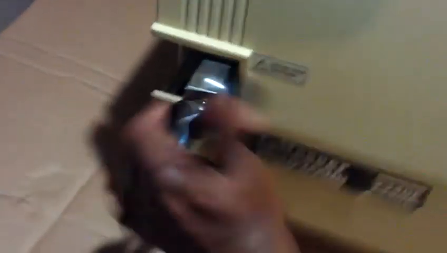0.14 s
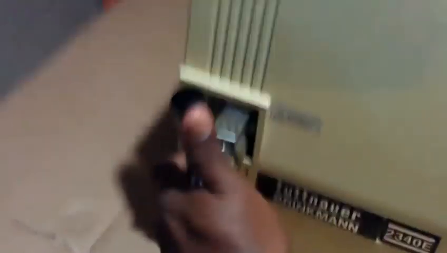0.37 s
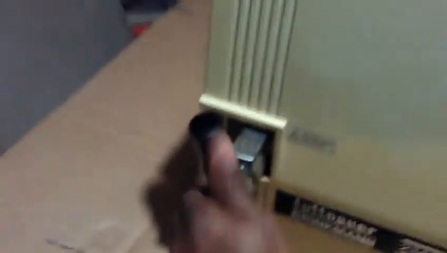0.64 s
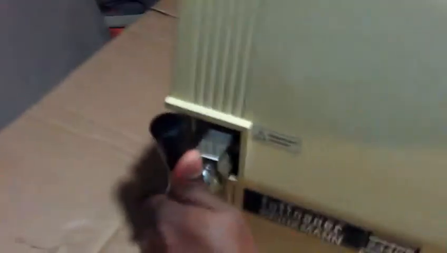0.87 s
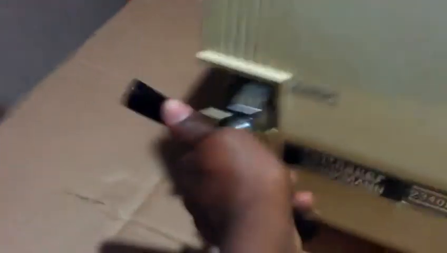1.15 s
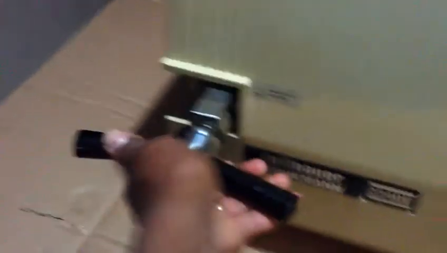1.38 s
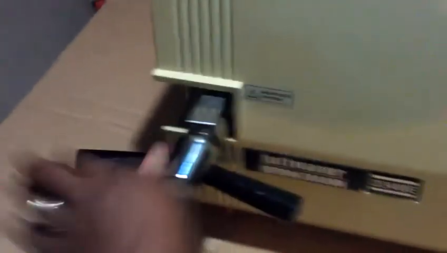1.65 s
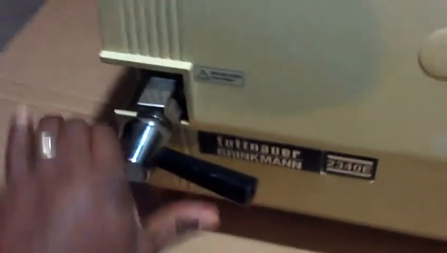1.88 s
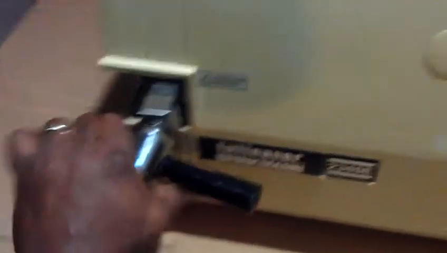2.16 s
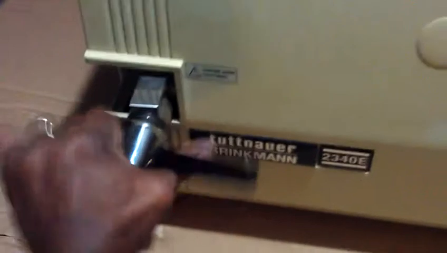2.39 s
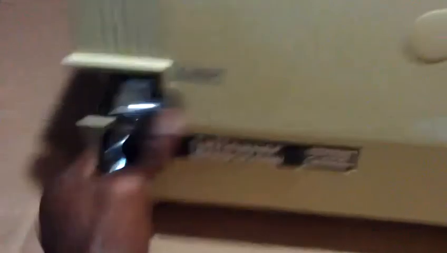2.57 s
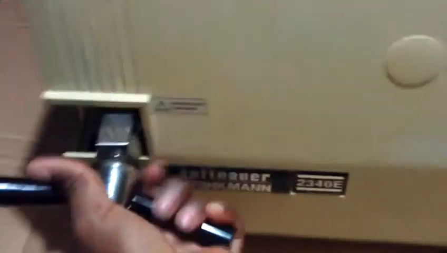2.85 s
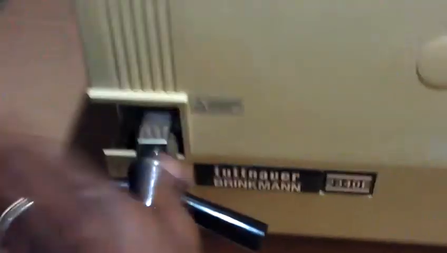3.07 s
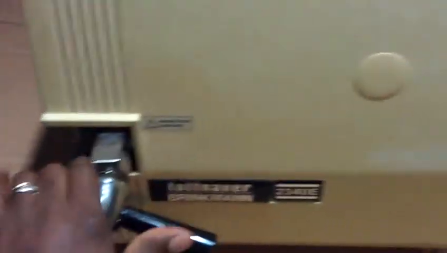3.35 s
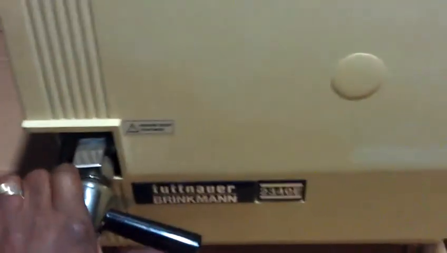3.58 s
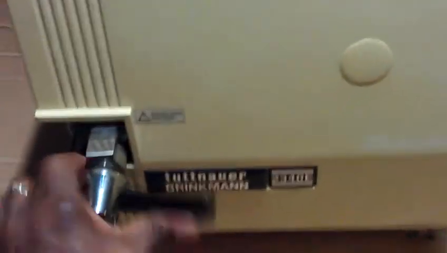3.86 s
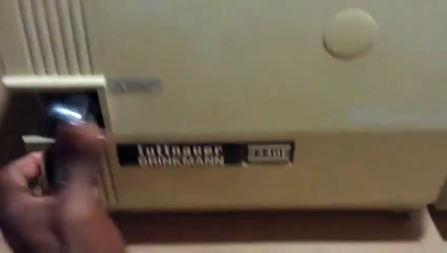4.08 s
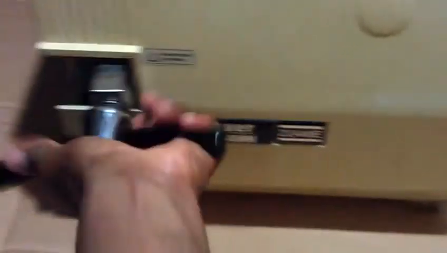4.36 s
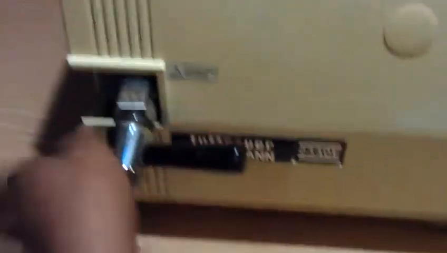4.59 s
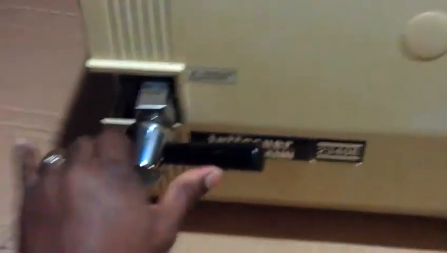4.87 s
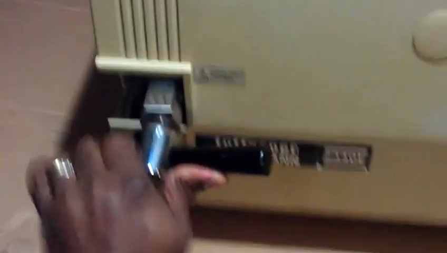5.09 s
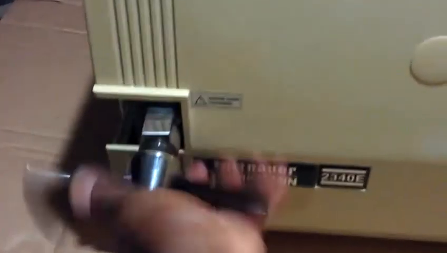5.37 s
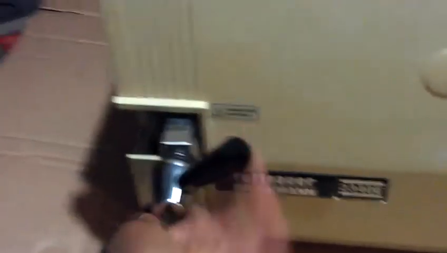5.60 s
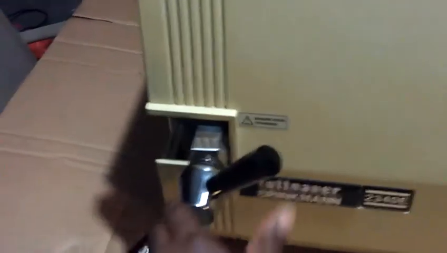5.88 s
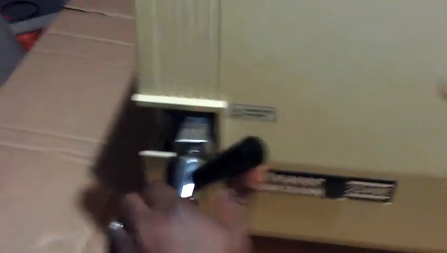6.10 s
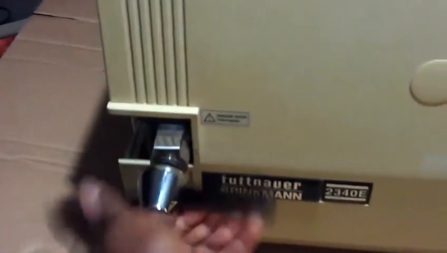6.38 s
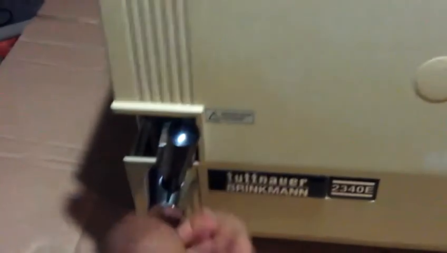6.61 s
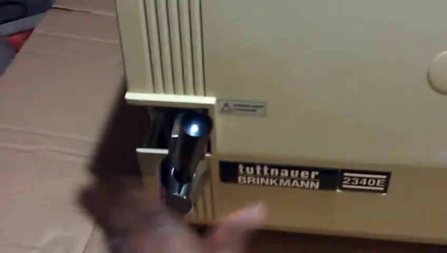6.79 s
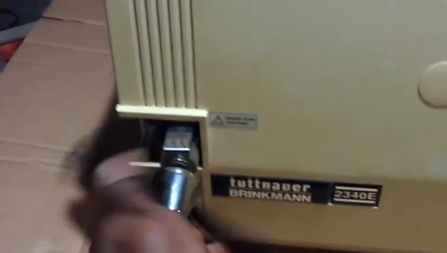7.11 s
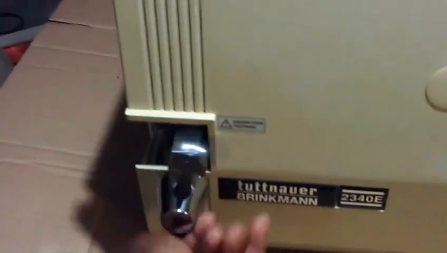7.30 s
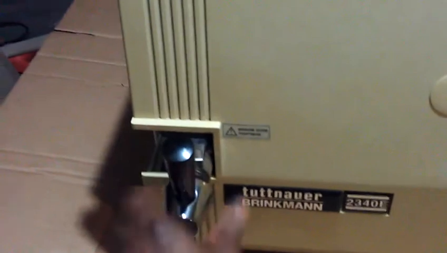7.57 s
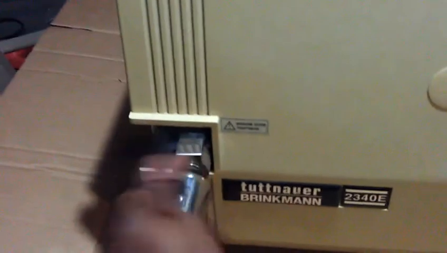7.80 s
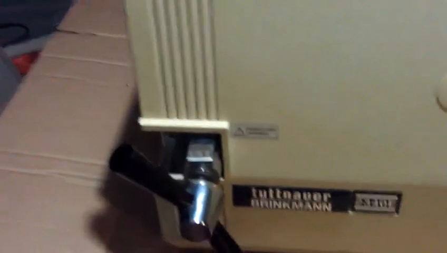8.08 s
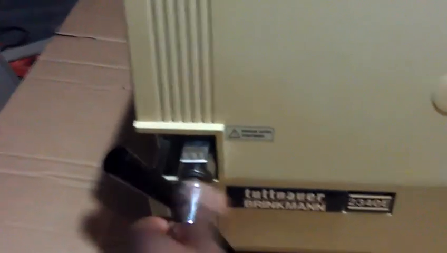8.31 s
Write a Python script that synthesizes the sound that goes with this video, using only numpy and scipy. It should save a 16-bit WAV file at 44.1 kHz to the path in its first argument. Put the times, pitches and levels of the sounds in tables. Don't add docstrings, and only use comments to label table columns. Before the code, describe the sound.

Very close, a hand works a loose metal handle on a hollow steel door. Five sharp clacks land at uneven gaps, most of them loud, each with a short boom and shudder. Between them come scrapes, finger ticks, thin snaps and brief squeaks. Near the end the bar slides and chatters quickly. Steady night insects and hiss sit behind, in a small shed with short reverberation, through a slightly clipping small camera microphone.

```python
import sys
import numpy as np
from scipy import signal
from scipy.fft import rfft, irfft, next_fast_len
from scipy.io import wavfile
from scipy.ndimage import map_coordinates

SR = 44100
rng = np.random.default_rng(int(sys.argv[2]) if len(sys.argv) > 2 else 0)


def convert_level_to_amplitude(level_db):
    exponent = np.asarray(level_db, float) / 20
    return 10 ** exponent


def transcribe(u):
    v = np.clip(np.atleast_2d(u).T, -1, 1)
    q = np.round(v * 32767).astype(np.int16)
    wavfile.write(sys.argv[1], SR, q)


N = 372644
T = np.arange(N) / SR

# frequency in Hz, density in dB per Hz.
AIR_DENSITY = [(24, -60), (40, -27), (91, -22.5), (108, -9.5), (210, -11.5), (229, -2.5), (438, -4),
               (478, 1), (521, -11), (807, -0.5), (1270, -8), (1650, -3.5), (2600, -14), (3380, -20.5),
               (5720, -120)]
# frequency in Hz, density in dB per Hz.
HISS_DENSITY = [(1500, -32), (2300, -15), (3500, 7.5), (5200, -1), (5800, -48), (6900, -34), (7700, 1),
                (8500, -7.5), (9500, -0.5), (11000, 0.5), (13900, 1.5), (14500, -36)]
# frequency in Hz, density in dB per Hz.
TREE_CHORUS = [(2750, -24), (2850, -9), (2930, -9), (3020, -9.5), (3150, -33)]
# frequency in Hz, density in dB per Hz.
GRASS_CHORUS = [(6000, -18), (6250, -3), (6400, -0.5), (6560, 0), (6700, -6.5), (6880, -25.5)]
# start in seconds, chirp level in dB.
CRICKET_CHIRPS = [(.22, -48.5), (.6, -50), (1.35, -53), (1.73, -49), (2.55, -52), (2.98, -48), (3.37, -50),
                  (3.85, -49), (4.21, -45.5), (4.6, -72), (4.97, -50), (5.73, -47), (6.08, -44),
                  (6.47, -47), (6.83, -46.5), (7.23, -45.5), (7.6, -45), (8.18, -46)]

# frequency in Hz, left-right likeness from 0 to 1.
PORT_LIKENESS = [(60, 0.76), (200, 1), (500, 0.4), (1200, 0.17), (3000, 0.14), (13000, 0.12)]
# frequency in Hz, left minus right in dB.
PORT_TILT = [(60, 4), (110, 8), (200, 0), (360, 2), (660, 4.5), (1210, -3), (2200, 1), (4010, 1), (7310, 1),
             (13300, 9)]
# frequency in Hz, lag in radians.
PORT_LAG = [(100, 0.88), (260, 0.13), (700, 2.92), (1100, 3.94), (1700, 5.44), (14000, 7.35)]
# frequency in Hz, t60 in seconds.
SHED_T60 = [(150, 0.42), (1000, 0.36), (4000, 0.25), (12000, 0.24)]

# frequency in Hz, width in Hz, level in dB.
CHAMBER_MODES = [(139.8, 34, -10), (188, 27, -0.5), (300, 61, -3.5), (360, 32.5, -0.5), (425, 26, 0.5),
                 (563, 82, -4.5)]
# frequency in Hz, width in Hz, level in dB.
BAR_MODES = [(850, 87, 4), (1050, 87, 4.5), (1440, 173, 1.5), (1745, 140, 2.5), (2445, 790, -3)]
# frequency in Hz, width in Hz, level in dB.
HUB_MODES = [(2500, 71, -13), (2904, 610, 0), (3600, 120, -1), (4020, 274, -1), (4625, 380, 0),
             (5224, 760, -4.5)]
# frequency in Hz, width in Hz, level in dB.
PORT_MODES = [(8550, 1000, 1.5), (9850, 620, 7), (10900, 1130, 7), (13000, 2700, -7)]
# frequency in Hz, level in dB, t60 in seconds.
STEEL_PARTIALS = [(1762, -8, 0.08), (3130, -53, 0.27), (3570, -22, 0.2), (4020, -36, 0.083),
                  (10200, -28, .08), (10000, -38, .12), (10650, -46, 0.33)]

# start in seconds, rumble in dB, boom in dB.
SHUDDERS = [(0.149, -29.5, -18), (1.044, -34, -39), (2.39, -29.5, -22.5), (3.878, -44, -32),
            (5.39, -24.5, -19.5)]
SHUDDER_FALL_20DB_S = 0.14
# frequency in Hz, level in dB.
DOOR_MODES = [(186, 0.5), (175.9, -2.5), (140, -8.5)]
BOOM_RISE_S, BOOM_T60_S = 0.01, 0.32

# time in seconds, rumble in dB.
GRIP = [(0, -39.5), (.55, -44.5), (1.0, -44), (1.4, -45.5), (2.3, -43), (2.5, -42.5), (2.8, -50.5),
        (3.08, -54), (3.6, -50), (3.9, -44.5), (4.6, -49.5), (5.5, -48), (6.1, -54.5), (8.45, -58)]
GRIP_BAR_DB, GRIP_RASP_DB, GRIP_SKIN_DB = -82, -60.5, -62.5
# start in seconds, length in seconds,
# bar level in dB, weight in dB, brightness in dB.
SLIDES = [(5.1, 0.23, -37.5, -6.5, -6), (6.17, 0.15, -37, -0.5, -6), (6.3, 0.14, -35.5, 1, -7.5),
          (7.09, 0.082, -34.5, -4, -12), (7.17, 0.1, -35, 6, -6.5), (7.8, 0.15, -34.5, 4.5, -6)]
SLIDE_RISE_DB, SLIDE_FALL_20DB_S = 17.5, 0.092
# start in seconds, length in seconds, bar level in dB,
# weight in dB, brightness in dB.
TURNS = [(.015, 0.017, -61, 8, 10), (.335, 0.072, -44.5, -18, -6.5), (.49, 0.025, -61, 20, 5),
         (1.14, .22, -53, 6, -0.5), (1.5, 0.082, -64, -5, 12), (2.03, 0.033, -53, 0, -16),
         (2.5, 0.17, -48.5, 6, -2), (2.66, 0.12, -46.5, -8, 1.5), (2.93, 0.16, -52.5, 10, -4),
         (3.3, 0.041, -56.5, 13.5, -12), (3.4, 0.1, -62, -1, 6), (3.99, 0.19, -45.5, -15, -5.5),
         (4.24, 0.17, -42.5, -6, -7), (4.68, .05, -51, -15, -6), (5.86, 0.059, -64, 15, -11),
         (4.19, 0.051, -46, 9.5, -4), (5.645, .02, -65.5, -2, 15), (6.66, 0.021, -65, 2, 14),
         (7.47, .02, -66, 2, 14), (8.13, 0.033, -61.5, 15, 10.5)]
TURN_RISE_20DB_S, TURN_FALL_20DB_S = 0.032, 0.055
RASP_DB, RASP_SHARE = -3, 0.56

# start in seconds, length in seconds, from Hz, to Hz, level in dB.
SQUEAKS = [(2.03, 0.029, 1400, 1700, -39), (2.03, 0.016, 850, 830, -28), (2.421, 0.057, 1110, 1106, -37),
           (2.616, 0.132, 3080, 3140, -42), (2.715, 0.11, 3500, 3220, -45), (4.2, 0.025, 3114, 3090, -36),
           (5.551, 0.051, 1140, 1110, -38.5), (5.357, 0.02, 1750, 1740, -32),
           (6.195, 0.113, 1528, 1500, -36), (6.41, 0.027, 1550, 1470, -25), (7.846, 0.092, 1050, 1055, -36),
           (5.2, 0.13, 2000, 2050, -44.5), (3.878, 0.013, 1560, 1530, -25)]
# start in seconds, length in seconds, from Hz, to Hz, level in dB.
WHISTLES = [(6.442, 0.036, 3600, 3600, -39), (6.476, 0.025, 3060, 3050, -37),
            (7.158, .022, 3570, 3540, -38), (7.978, 0.029, 3090, 3090, -33)]

# start in seconds, peak in dB, colour in Hz, sizzle in dB.
SCUFFS = [(.146, -26, 2320, -9), (1.042, -25.5, 2970, -8), (2.392, -30, 1700, -12),
          (5.386, -22.5, 2400, -5.5), (.332, -24, 3070, -18), (.478, -41, 8500, 6), (1.2, -55, 3600, -6)]
# start in seconds, peak in dB, colour in Hz, sizzle in dB.
CRACKS = [(1.509, -32, 3600, 0), (3.7524, -25.5, 2500, -3.5), (4.6872, -26.5, 4940, -7)]
LIGHT_THUD_DB, LIGHT_THUD_HZ = -29, 328
# start in seconds, peak in dB, colour in Hz, sizzle in dB.
SNAPS = [(0.026, -23.5, 10800, -30), (1.492, -23, 11900, -12), (1.506, -28, 10600, -15),
         (1.578, -33, 8850, -4), (1.909, -38, 11200, -10), (1.9739, -36, 10600, -14),
         (2.0857, -36, 9770, -12), (2.202, -24, 9400, -16), (2.925, -24.5, 9900, -8),
         (3.3688, -32, 10500, -12), (3.4291, -30, 10700, -22), (3.5104, -36, 12100, -14),
         (4.139, -41, 11300, -21), (4.4886, -34, 10200, -19), (4.6079, -41, 11300, -15),
         (4.7376, -37, 11700, -14), (4.7552, -29, 11500, -15), (5.0893, -37, 12300, -12),
         (7.476, -31, 10900, -17), (8.1274, -46, 10040, -12)]
# start in seconds, peak in dB, colour in Hz, thud in dB,
# thud in Hz.
TICKS = [(1.533, -31, 3600, -26, 198), (1.671, -29, 784, -0.5, 370), (2.025, -21, 5330, -19, 211),
         (2.03, -22.5, 1500, -23, 423), (2.935, -25, 865, -10, 219), (2.985, -33, 885, -11, 408),
         (3.31, -41, 2950, 9, 412), (3.4, -24.5, 2530, -16, 310), (3.441, -23, 2240, -16, 315),
         (3.496, -30.5, 2330, -16, 229), (4.212, -32, 3110, -14, 273), (5.229, -32, 1880, 0, 186),
         (5.882, -45, 2850, 9, 462), (6.206, -29, 1560, -11, 198), (6.275, -26, 1550, -6, 570),
         (6.341, -30, 1530, 3, 306), (6.382, -25, 1500, -6, 199), (6.416, -16.5, 1570, -8.5, 360)]
# start in seconds, peak in dB, colour in Hz, thud in dB, thud in Hz.
CHATTER = [(6.23, -33, 1480, -16, 300), (6.248, -30, 1480, -16, 300), (6.453, -28, 1460, -8, 300),
           (7.117, -35, 1440, -6, 398), (7.126, -38.5, 1030, 6.5, 400), (7.137, -34, 1480, -12, 400),
           (7.163, -29, 1030, 1, 457), (7.178, -34, 1030, 0, 420), (7.207, -29.5, 1020, 3, 400),
           (7.226, -29.5, 1440, 2.5, 300), (7.258, -25, 1440, -7, 400), (7.275, -30, 1440, 2.5, 400),
           (7.292, -33, 1030, 6.5, 350), (7.303, -30, 1470, -4, 300), (7.314, -32, 1440, 4, 300),
           (7.334, -40.5, 1030, 8.5, 324), (7.833, -36, 1460, -2, 400), (7.843, -34, 1060, 4.5, 380),
           (7.854, -31, 1060, -2, 300), (7.869, -33, 1060, 4, 328), (7.884, -29, 1060, -3, 328),
           (7.892, -30, 1440, 4.5, 330), (7.903, -29.5, 1440, -1, 327), (7.919, -30, 1050, -7, 400),
           (7.932, -29, 1440, 2, 422), (7.945, -32, 1440, -2, 420), (7.965, -28, 2500, -1, 400),
           (7.98, -33, 1440, 4, 330), (7.998, -39, 1440, 7, 330), (8.019, -43, 1040, 9, 280)]
DULL_SIZZLE_DB = -23
# start in seconds, peak in dB, thud in dB, sizzle in dB.
CATCHES = [(6.2914, -19.5, -40, -2), (7.1569, -21, -17, -12), (7.2423, -20.5, -30, -2),
           (7.9592, -21.5, -32, -12)]
CATCH_HZ, CATCH_THUD_HZ = 1500, 415
# start in seconds, peak in dB, colour in Hz, # thud
# in dB, thud in Hz.
BAR_CONTACTS = [(0.141, -18, 2010, -32, 360), (0.1488, -18, 1800, -32, 360), (1.0323, -11, 5460, -26, 395),
                (1.037, -11.5, 1610, -20.5, 408), (2.386, -13.5, 1606, -36, 300), (3.874, -20, 2620, -32, 300),
                (3.8812, -21, 2500, -17, 424), (5.3785, -12, 2270, -32, 400), (5.379, -15.5, 4370, -32, 400),
                (0.1375, -15.5, 2500, -32, 360), (2.3837, -16, 4700, -32, 300), (6.2934, -22, 4200, -32, 400),
                (7.1571, -24.5, 3600, -32, 400), (7.243, -24, 3220, -32, 400), (7.9548, -24, 3000, -32, 400),
                (5.3843, -10.5, 1690, -12, 429)]
BAR_CONTACT_SIZZLE_DB = -16
# start in seconds, peak in dB, colour in Hz, sizzle in dB, thud in Hz.
CLACKS = [
    (0.1363, -5, 4960, 2.5, 354.4),
    (1.0286, -4, 4500, -4.5, 530),
    (2.3824, -11, 2610, -4, 300),
    (3.8722, -12, 1470, -8.5, 417),
    (5.3772, -4, 3130, -2, 378),
]
CLACK_THUD_DB = -28.5
# start in seconds, frequency in Hz, level in dB, t60 in seconds.
LANDING_RINGS = [(.1365, 1680, -19, 0.055), (.1365, 2500, -21, .05), (.1365, 4980, -15, .03),
                 (.1365, 5250, -14, .03), (.1365, 10200, -11, .025), (1.029, 570, -17, 0.074),
                 (1.029, 1500, -20, .06), (1.029, 1740, -23, 0.065), (1.029, 2810, -17, .04),
                 (1.029, 4330, -13, .04), (1.029, 5430, -19, .03), (1.029, 11300, -15, .03),
                 (2.3825, 1660, -16.5, .055), (2.3825, 2500, -21, .06), (2.3825, 2720, -22, .03),
                 (2.3825, 480, -26, .05), (3.8727, 1644, -22, .06), (3.8727, 2483, -23, .05),
                 (3.8727, 570, -30, .05), (3.8727, 330, -31, .06), (5.378, 850, -19, 0.097),
                 (5.378, 1031, -16, .08), (5.378, 1815, -22, .06), (5.378, 2990, -20, 0.064),
                 (5.378, 626, -22, .04), (5.378, 9650, -14, .03), (5.378, 12530, -20, .025),
                 (6.292, 1850, -27, .05), (6.292, 2380, -28, .045), (6.292, 7650, -28, 0.033),
                 (6.292, 12300, -30, .025)]
RING_RISE_S = 0.00061


def unit(x):
    return x / np.sqrt(np.mean(x ** 2) + 1e-20)


def peak(x):
    return x / np.abs(x).max()


def along(points, hz):
    f, v = np.transpose(points)
    return np.interp(np.log(hz + 1), np.log(f + 1), v)


def wobble(rate_hz):
    knots = rng.standard_normal(int(N * rate_hz / SR) + 4)
    return map_coordinates(knots, [T * rate_hz])


def filtered(x, response):
    m = next_fast_len(x.shape[-1] + 2048)
    spectrum = rfft(x, m) * response(np.fft.rfftfreq(m, 1 / SR))
    return irfft(spectrum, m)[..., :x.shape[-1]]


def body(modes):
    def response(f):
        total = 0
        for k, (hz, width_hz, db) in enumerate(modes):
            total = total + (-1) ** k * convert_level_to_amplitude(db) * 1j * f * width_hz / (hz * hz - f * f + 1j * f * width_hz)
        return total
    return response


def noise(density):
    points = [(1, -120)] + density + [(SR, -120)]
    return unit(filtered(rng.standard_normal((2, N)), lambda hz: convert_level_to_amplitude(along(points, hz))))


def ports(pair, closeness=0.):
    def mix(hz):
        alike = np.clip(along(PORT_LIKENESS, hz) + closeness, 0, 1)
        half_tilt_db = .5 * along(PORT_TILT, hz)
        late = np.exp(-1j * along(PORT_LAG, hz)) * convert_level_to_amplitude(-half_tilt_db)
        return np.array([convert_level_to_amplitude(half_tilt_db), alike * late, np.sqrt(1 - alike ** 2) * late])
    left, shared, own = filtered(pair[[0, 0, 1]], mix)
    return np.array([left, shared + own])


def night():
    air = convert_level_to_amplitude(-46 + 0.11 * wobble(3.65) + 1.24 * wobble(25)) * noise(AIR_DENSITY)
    hiss = convert_level_to_amplitude(-54.5) * noise(HISS_DENSITY)
    trees = convert_level_to_amplitude(-51 + 0.96 * wobble(17)) * noise(TREE_CHORUS)
    grass = convert_level_to_amplitude(-48.0 + 1.7 * wobble(18)) * noise(GRASS_CHORUS)
    chirp = np.zeros(N)
    for s, db in CRICKET_CHIRPS:
        at = slice(int(s * SR), int(s * SR) + SR // 4)
        u = T[at] - s
        edges = np.clip(np.minimum(u, 0.174 - u) / 0.0069, 0, 1)
        chirp[at] += convert_level_to_amplitude(db) * edges * np.sin(np.pi * 26 * u) ** 2
    cricket = chirp * np.sin(2 * np.pi * 6135 * T + 1.2 * wobble(40))
    whine = convert_level_to_amplitude(-60.5 + 3.3 * wobble(4.14)) * np.sin(2 * np.pi * 1603 * T + 1.9 * wobble(6))
    return air + hiss + trees + grass + cricket + whine


def shed(x):
    step, out = SR // 2, np.zeros((2, N + 2 * SR))
    delay = round(.005 * SR)
    for start in range(-step // 2, N, step):
        first = max(start, 0)
        hz, t, z = signal.stft(rng.standard_normal((2, step)), SR, nperseg=256)
        decay = convert_level_to_amplitude(-60 * t / along(SHED_T60, hz)[:, None])
        tail = signal.istft(z * decay, SR, nperseg=256)[1]
        answer = signal.fftconvolve(x[:, first:start + step], tail / np.linalg.norm(tail[0]), axes=1)
        out[:, first + delay:][:, :answer.shape[1]] += answer
    return out[:, :N]


def door():
    out = np.zeros(N)
    for s, _, db in SHUDDERS:
        at = slice(int(s * SR), int(s * SR) + SR // 2)
        u = T[at] - s
        ring = sum(convert_level_to_amplitude(level) * np.sin(2 * np.pi * hz * u) for hz, level in DOOR_MODES)
        swell = 1 - np.exp(-(u / BOOM_RISE_S) ** 2)
        out[at] += convert_level_to_amplitude(db - 2.5 - 60 * u / BOOM_T60_S) * swell * ring
    return out


def strokes():
    rest_db = np.interp(T, *np.transpose(GRIP))
    flat = np.zeros(N)
    power = convert_level_to_amplitude(np.array([rest_db, flat + GRIP_BAR_DB, flat + GRIP_RASP_DB, flat + GRIP_SKIN_DB])) ** 2
    for rows, sliding in ((SLIDES, True), (TURNS, False)):
        for s, length, db, weight_db, bright_db in rows:
            at = slice(max(int(s * SR) - SR // 10, 0), int((s + length) * SR) + SR // 4)
            t = T[at]
            before, after = np.maximum(s - t, 0), np.maximum(t - s - length, 0)
            fall_s = SLIDE_FALL_20DB_S if sliding else TURN_FALL_20DB_S
            shape_db = -20 * before / TURN_RISE_20DB_S - 20 * after / fall_s
            if sliding:
                shape_db = shape_db - SLIDE_RISE_DB * np.maximum(s + length - t, 0) / length
            colour_db = np.array([weight_db, 0, RASP_DB + RASP_SHARE * bright_db, bright_db])
            power[:, at] += convert_level_to_amplitude(db + colour_db[:, None] + shape_db) ** 2
    for s, db, _ in SHUDDERS:
        at = slice(int(s * SR), int(s * SR) + SR // 2)
        power[0, at] += convert_level_to_amplitude(db - 20 * (T[at] - s) / SHUDDER_FALL_20DB_S) ** 2
    return np.sqrt(power)


def rubbing():
    out = 0
    bodies = (CHAMBER_MODES, BAR_MODES, HUB_MODES, PORT_MODES)
    lumps = (4.6, 4.0, 2.3, 2.0)
    rates_hz = (34.52, 70.4, 109.3, 58.8)
    for level, modes, lumps_db, rate_hz in zip(strokes(), bodies, lumps, rates_hz):
        coarse_db = lumps_db * np.clip(wobble(rate_hz), -2, 1.3)
        fine_db = .5 * lumps_db * wobble(5 * rate_hz)
        grains = convert_level_to_amplitude(coarse_db + fine_db) * rng.standard_normal((2, N))
        out = out + level * unit(filtered(grains, lambda f: body(modes)(f) ** 1.286))
    return out


def squeaks(rows, unsteady):
    out = np.zeros((2, N))
    flutter = convert_level_to_amplitude(2.1 * wobble(76))
    waver = unsteady * np.array([wobble(170), wobble(170)])
    for s, length, from_hz, to_hz, db in rows:
        at = slice(int(s * SR), int((s + length) * SR))
        u = T[at] - s
        phase = 2 * np.pi * (from_hz * u + (to_hz - from_hz) * u * u / (2 * length))
        swell = np.abs(np.sin(np.pi * u / length)) ** .5
        out[:, at] += convert_level_to_amplitude(db) * swell * flutter[at] * np.sin(phase + waver[:, at] * from_hz / 3200)
    return out


def light_contacts(rows):
    return [(s, db, hz, LIGHT_THUD_DB, sizzle, LIGHT_THUD_HZ) for s, db, hz, sizzle in rows]


def dull_contacts(rows):
    return [(s, db, hz, thud, DULL_SIZZLE_DB, thud_hz) for s, db, hz, thud, thud_hz in rows]


def heavy_contacts():
    clacks = [(s, db, hz, CLACK_THUD_DB, sizzle, thud_hz) for s, db, hz, sizzle, thud_hz in CLACKS]
    bar_contacts = [(s, db, hz, thud, BAR_CONTACT_SIZZLE_DB, thud_hz) for s, db, hz, thud, thud_hz in BAR_CONTACTS]
    catches = [(s, db, CATCH_HZ, thud, sizzle, CATCH_THUD_HZ) for s, db, thud, sizzle in CATCHES]
    return sorted(clacks + bar_contacts + catches)


def blows(events, rattle_s, thud_s, thud_db, ring_db, broad_db, walls, spread=0.26):
    out = np.zeros((2, N + SR))
    t = np.arange(int(min(.2, 14 * thud_s + 3 * rattle_s) * SR)) / SR
    for s, db, hz, low_db, high_db, thud_hz in events:
        rattle = np.exp(-(t / rattle_s) ** 1.32) * (1 - np.exp(-t / 0.00024))
        burst = rattle * rng.standard_normal((2, len(t)))
        own = peak(filtered(burst, lambda f: body([(hz, spread * hz, 0)])(f) ** 2))
        hard = convert_level_to_amplitude(0.078 * high_db)
        broad = 0.75 * peak(filtered(burst, body(BAR_MODES))) + hard * peak(filtered(burst, body(HUB_MODES)))
        sizzle = peak(filtered(burst, lambda f: body(PORT_MODES)(f) ** 1.3))

        push = t / thud_s * np.exp(-t / thud_s) * rng.standard_normal((2, len(t)))
        boom_shape = np.exp(-t / (1.52 * thud_s)) * (1 - np.exp(-(t / (0.36 * thud_s)) ** 2))
        boom = np.sin(2 * np.pi * thud_hz * t) * boom_shape
        thud = peak(boom) + walls * peak(filtered(push, body(CHAMBER_MODES)))

        ring = 0
        for f, level, t60 in STEEL_PARTIALS:
            decay = convert_level_to_amplitude(level + rng.normal(0, 1.3, (2, 1)) - 60 * t / t60)
            ring = ring + decay * np.sin(2 * np.pi * f * t + rng.uniform(0, 5.0, (2, 1)))
        hit = own + convert_level_to_amplitude(broad_db) * broad + convert_level_to_amplitude(high_db + 5.0) * sizzle
        hit = hit + convert_level_to_amplitude(low_db + thud_db) * thud + convert_level_to_amplitude(ring_db) * hard * ring
        out[:, round(s * SR):][:, :len(t)] += convert_level_to_amplitude(db) * hit
    return out[:, :N]


def rings():
    out, t = np.zeros(N), np.arange(SR // 8) / SR
    rise = 1 - np.exp(-t / RING_RISE_S)
    for s, hz, db, t60 in LANDING_RINGS:
        out[round(s * SR):][:len(t)] += convert_level_to_amplitude(db - 60 * t / t60) * rise * np.sin(2 * np.pi * hz * t)
    return out


def scene():
    thread = squeaks(SQUEAKS, unsteady=2.6) + squeaks(WHISTLES, unsteady=0.68)
    scuffs = blows(light_contacts(SCUFFS), rattle_s=0.036, thud_s=0.0071, thud_db=-7, ring_db=-30,
                   broad_db=0.0, walls=.3)
    cracks = blows(light_contacts(CRACKS), rattle_s=0.00092, thud_s=0.0069, thud_db=0, ring_db=-32,
                   broad_db=-1.0, walls=.3, spread=0.9)
    thin = [(s, db, hz, -40, sizzle_db, 300) for s, db, hz, sizzle_db in SNAPS]
    snaps = blows(thin, rattle_s=0.0015, thud_s=0.0065, thud_db=-8, ring_db=-37, broad_db=-16.5, walls=.3)
    ticks = blows(dull_contacts(TICKS), rattle_s=0.0045, thud_s=0.0066, thud_db=-2.0, ring_db=-38,
                  broad_db=-16, walls=0.55)
    chatter = blows(dull_contacts(CHATTER), rattle_s=.004, thud_s=.005, thud_db=-1.5, ring_db=-45,
                    broad_db=-10, walls=0.66, spread=0.13)
    clacks = blows(heavy_contacts(), rattle_s=0.0048, thud_s=0.01, thud_db=4.0, ring_db=-14,
                   broad_db=-0.5, walls=1.0, spread=0.37)
    lead = convert_level_to_amplitude(-24) * np.roll(clacks, -round(0.0024 * SR), axis=1)
    near = door() + thread + scuffs + cracks + snaps + ticks + chatter + lead + clacks + rings()
    return ports(near + rubbing(), closeness=0.29) + ports(convert_level_to_amplitude(-9.5) * shed(near) + night())


def band_limit(x):
    return signal.sosfilt(signal.butter(12, 13930, fs=SR, output="sos"), x)


def record(dry):
    dry = filtered(dry, lambda hz: (1j * hz / (1j * hz + 40)) ** 2 / (1 + (hz / 14300) ** 24))
    follow = 1 / (.12 * SR)
    loud = signal.lfilter([follow], [1, follow - 1], np.mean(dry ** 2, 0))
    ducked = dry / (1 + loud / convert_level_to_amplitude(-7) ** 2) ** 0.066
    clipped = ducked / (1 + np.abs(ducked / 0.98) ** 8) ** (1 / 8)
    mix = filtered(clipped, lambda hz: np.where(hz > 14000, convert_level_to_amplitude(-12), 1))
    return band_limit(mix)


dry = scene()
out = record(dry)
transcribe(out)
```